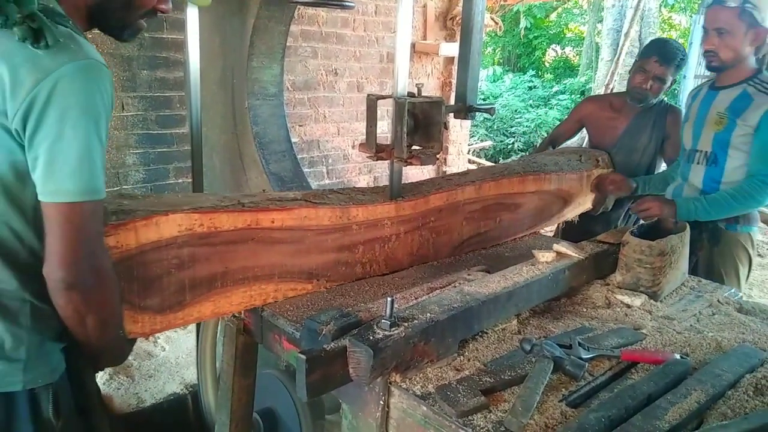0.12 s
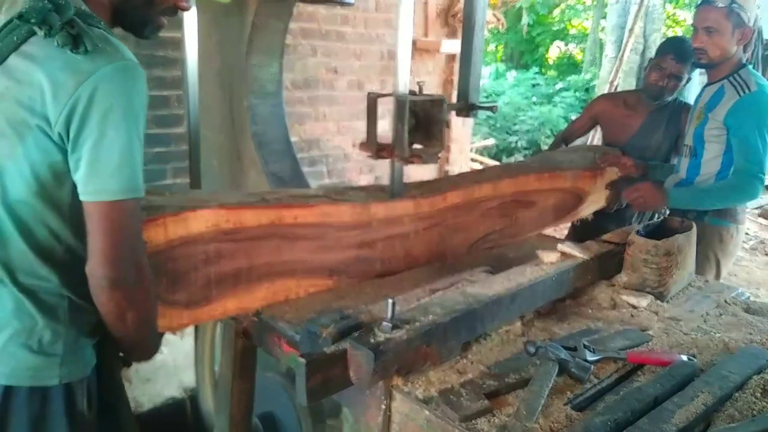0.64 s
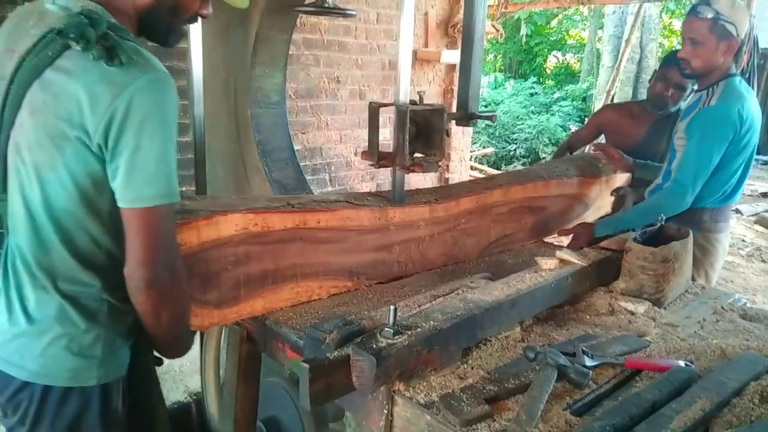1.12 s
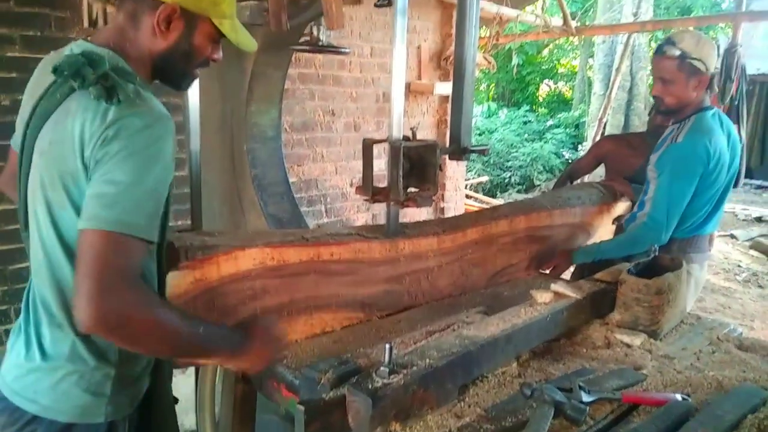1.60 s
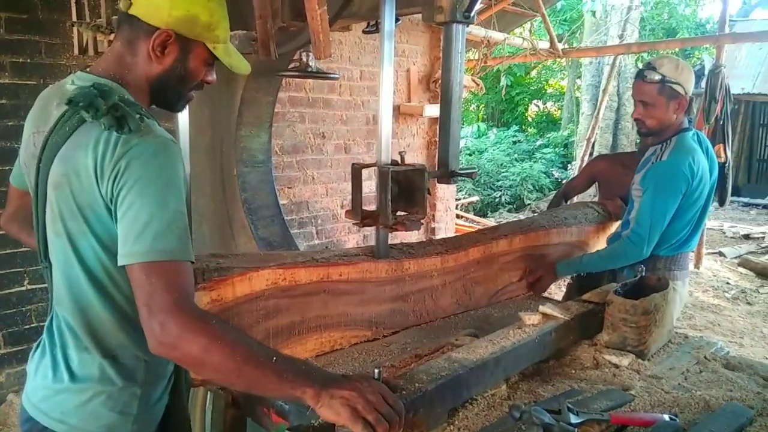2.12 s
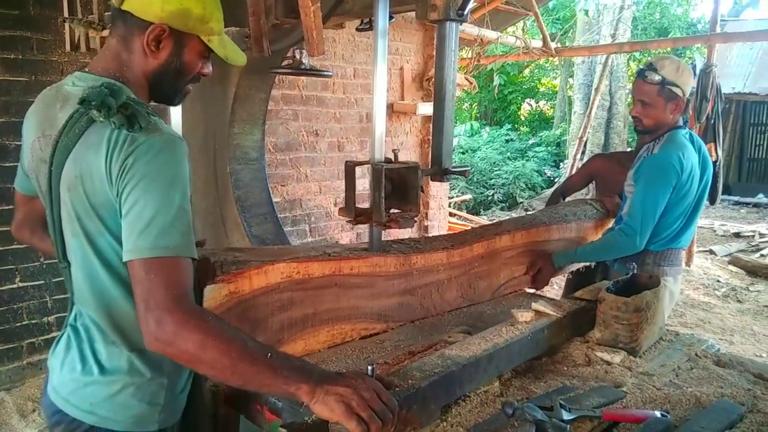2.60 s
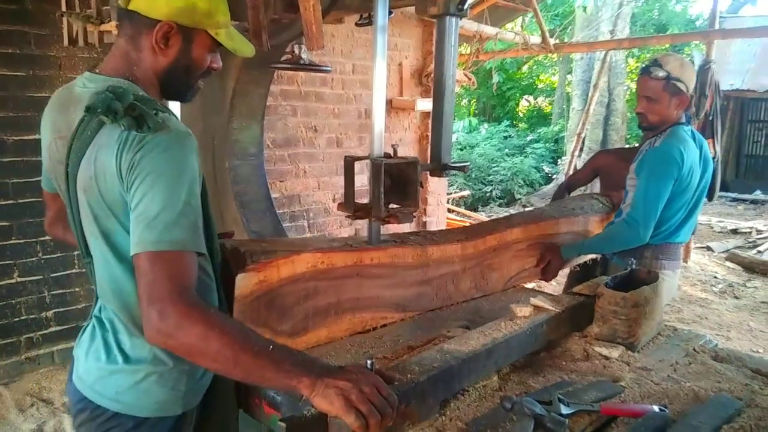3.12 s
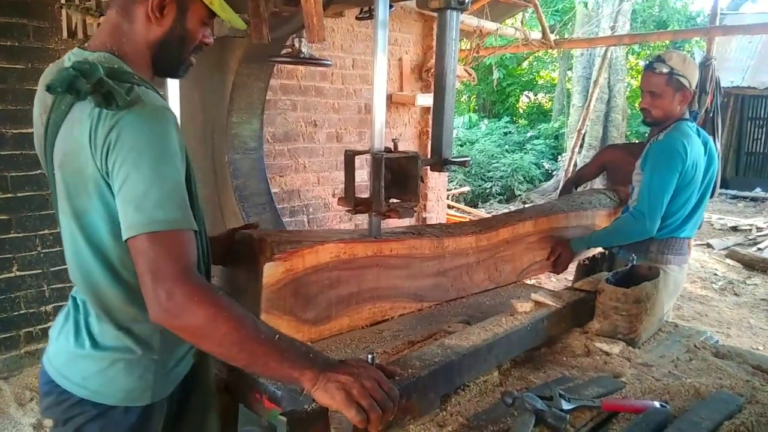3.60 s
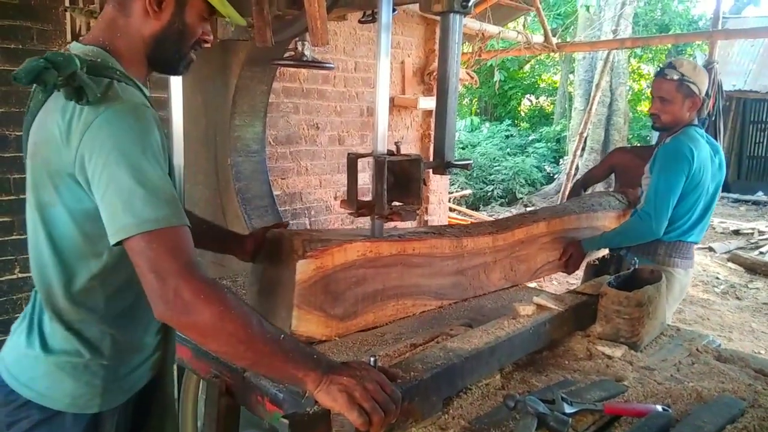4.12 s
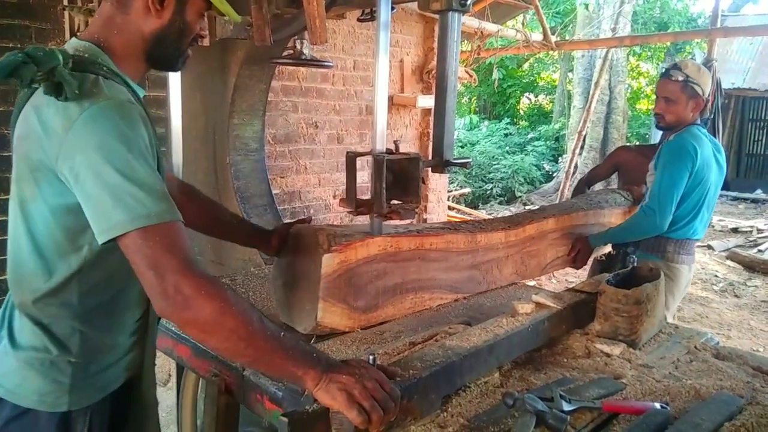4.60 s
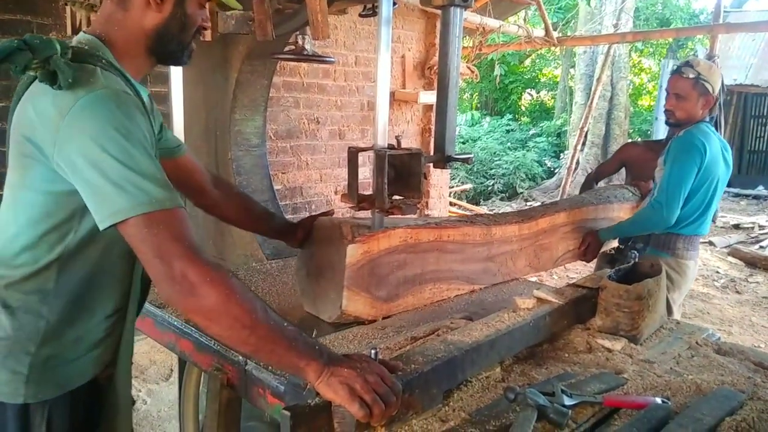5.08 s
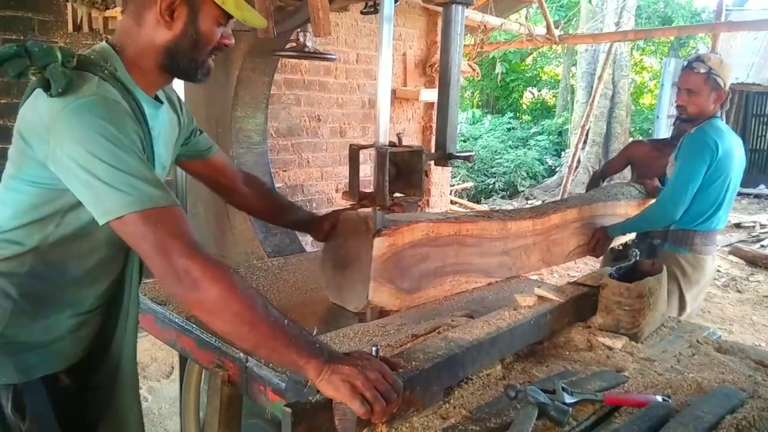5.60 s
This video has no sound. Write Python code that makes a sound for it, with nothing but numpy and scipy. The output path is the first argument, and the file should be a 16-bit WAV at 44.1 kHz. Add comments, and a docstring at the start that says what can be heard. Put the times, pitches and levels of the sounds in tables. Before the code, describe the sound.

In an open shed, a big band saw is already ripping a thick wooden slab and never stops. Loud bright hiss of tearing fibres dominates, over ringing blade steel, a mid-pitched frame hum and low rumble. Short, rough swells come where the teeth bite harder. Very close and slightly overloaded microphone, dry, heard only on the left; the right side is almost silent.

```python
"""In an open shed, a large band saw rips a timber slab close to a single microphone on the left input.
Tearing fibres hiss, as coloured noise, and shake the steel blade, whose cross-width modes ring;
the frame hums as noise shaped by narrow resonances, over a low rumble. The blade's laps and the wheels'
turning throb faintly in the cut as slow sine swings of level. The right input carries only amplifier noise."""
import sys
import numpy as np
from scipy import signal
from scipy.fft import rfft, irfft, next_fast_len
from scipy.io import wavfile
from scipy.ndimage import uniform_filter1d, map_coordinates

SR = 44100
rng = np.random.default_rng(int(sys.argv[2]) if len(sys.argv) > 2 else 0)


def to_wav(s):
    """Save 16-bit WAV."""
    ch = np.atleast_2d(s).T  # columns
    pcm = np.round(np.clip(ch, -1, 1) * 32767)  # PCM
    wavfile.write(sys.argv[1], SR, pcm.astype(np.int16))


def gain_from_db(level_db):
    """Turn a decibel level (scalar or array-like) into a linear amplitude factor."""
    decades = np.asarray(level_db, float) / 20
    return 10 ** decades


N = 252252  # length in samples


def unit(x):
    """Normalisation: a signal divided by its root mean square has unit power."""
    return x / np.sqrt(np.mean(x ** 2) + 1e-20)


def along(spectrum, hz):
    """Spectral envelope: gain interpolated in dB between points on a logarithmic frequency axis."""
    point_hz, point_db = np.transpose(spectrum)
    return gain_from_db(np.interp(np.log(hz + 1), np.log(point_hz + 1), point_db))


def modes(table, hz):
    """Modal superposition: incoherent resonances add in power; width is taken at half amplitude."""
    power = 0
    for centre_hz, width_hz, db in table:
        detuning = 2 * (hz - centre_hz) / width_hz
        power = power + gain_from_db(db) ** 2 / (1 + detuning ** 2) ** 2
    return np.sqrt(power)


def cut_on(hz, cut_on_hz, rise_hz, fade_hz):
    """Waveguide cut-on: steep loss below (5 dB at rise_hz under it), 10 dB lost per fade_hz above."""
    below = ((cut_on_hz - hz) / rise_hz) ** 2 / 2
    above = (hz - cut_on_hz) / fade_hz
    return gain_from_db(-10 * np.where(hz < cut_on_hz, below, above).clip(0, 20))


def wobble(rate):
    """Slow random modulation: a smooth spline through random knots, rate of them a second."""
    knots = rng.standard_normal(int(N * rate / SR) + 4)
    return map_coordinates(knots, [np.arange(N) * rate / SR])


def noise(gain, patchy_db, size=512):
    """Filtered noise of unit rms with random patches in time and pitch; larger size: narrower, longer."""
    cells = signal.stft(rng.standard_normal(N + 2 * size), nperseg=size)[2]
    field = uniform_filter1d(rng.standard_normal(cells.shape), size=5, axis=0)
    field = uniform_filter1d(field, size=10, axis=1)
    patchy = signal.istft(cells * gain_from_db(patchy_db * unit(field)), nperseg=size)[1]
    length = next_fast_len(len(patchy))
    colour = gain(np.fft.rfftfreq(length, 1 / SR))
    return unit(irfft(rfft(patchy, length) * colour, length)[:N])


def loaded(feed_db, level_db, slope):
    """Load dependence: level_db over the mean feed, moving by slope dB per dB of feed."""
    mean_db = feed_db.mean()
    return mean_db + level_db + slope * (feed_db - mean_db)


def throb(table, lap):
    """Harmonic modulation: level swing in dB at multiples of the lap angle."""
    return sum(db * np.sin(multiple * lap + phase) for multiple, db, phase in table)


# How hard the slab is pushed, heard as the hiss. Each row: time in seconds, feed in dB.
FEED_PRESSURE = [(0, -16.6), (.1, -17.5), (.7, -17.5), (1.1, -17), (1.4, -17.5), (1.7, -17.5), (2.2, -17.5),
                 (2.6, -17), (2.9, -16.5), (3.5, -16.5), (3.95, -16.5), (4.3, -17), (4.8, -16.5),
                 (5.0, -17.5), (5.35, -16.5), (5.55, -16.5), (5.67, -15.5), (5.72, -16)]


def feed_pressure():
    """Quasi-static forcing: the push on the slab follows straight lines in dB between its points."""
    seconds, db = np.transpose(FEED_PRESSURE)
    return np.interp(np.arange(N) / SR, seconds, db)


# Spectrum of tearing fibres. Each row: frequency in Hz, relative density in dB per Hz.
FIBRE_SPECTRUM = [(300, -40), (1300, -18), (1800, -13.5), (2380, -16), (2900, -8), (3600, -11),
                  (4500, -12.5), (5900, -12.5), (7000, -4), (8900, 0), (10200, -5), (11500, -7),
                  (12600, -6), (13500, -8), (14400, -8)]
# Throb of the hiss. Each row: multiple of the lap rate, swing in dB, phase in radians.
HISS_SWING = [(2, .38, 1.7), (3, .15, 1.0), (4, .33, -.9), (5, .25, 1.0)]


def fibre_hiss(feed_db, lap, bite_db):
    """Broadband radiation: the tearing of the fibres is heard as coloured noise."""
    level_db = loaded(feed_db, level_db=-1.03, slope=1.33) + throb(HISS_SWING, lap) + bite_db
    return gain_from_db(level_db) * noise(lambda hz: along(FIBRE_SPECTRUM, hz), patchy_db=1.0)


# Throb of the upper blade band. Each row: multiple of the lap rate, swing in dB, phase in radians.
UPPER_SWING = [(1, .7, 2.8), (2, .9, -1.9), (4, .3, -.7)]


def upper_blade_band(feed_db, lap, bite_db):
    """Waveguide propagation: these waves run along the blade only above their cut-on pitch."""
    level_db = loaded(feed_db, level_db=-13.5, slope=2.3) + throb(UPPER_SWING, lap) + 0.6 * bite_db
    colour = lambda hz: cut_on(hz, cut_on_hz=6660, rise_hz=250, fade_hz=840)
    return gain_from_db(level_db) * noise(colour, patchy_db=3.5)


# Level changes where the teeth meet hard grain.
# Each row: centre in seconds, length in seconds (full width at 1/e of the dB gain), gain in dB.
GRAIN_SURGES = [(0.067, .05, 4), (.54, 0.033, 1), (0.643, 0.056, 3), (1.153, .12, 5), (1.7, .07, 3),
                (1.994, 0.036, 4), (2.24, 0.046, 3), (2.587, 0.031, 7), (3.936, .05, 3), (4.28, 0.063, 4.5),
                (5.165, 0.034, 4.5), (5.67, 0.061, -1.5)]


def surges():
    """Transient forcing: bell-shaped changes of level in dB, nearly all of them swells."""
    t = np.arange(N) / SR
    return sum(db * np.exp(-(2 * (t - s) / length) ** 2) for s, length, db in GRAIN_SURGES)


# Throb of the lower blade band. Each row: multiple of the lap rate, swing in dB, phase in radians.
LOWER_SWING = [(1, .6, 2.4), (2, .5, -3.0), (3, .9, -2.8)]


def lower_blade_band(feed_db, lap):
    """Waveguide propagation: a lower cut-on, its level moved by the surges and by a random flutter."""
    level_db = loaded(feed_db, level_db=-16.5, slope=0.4) + throb(LOWER_SWING, lap)
    flutter_db = 0.27 * wobble(39.7)
    colour = lambda hz: cut_on(hz, cut_on_hz=2482, rise_hz=29, fade_hz=230)
    return gain_from_db(level_db + surges() + flutter_db) * noise(colour, patchy_db=0.6, size=2048)


# Narrow blade modes. Each row: frequency in Hz, width in Hz, relative level in dB.
BLADE_MODES = [(1555, 22, -5), (1800, 50, -4), (2085, 28, -1), (2240, 60, -3), (2620, 60, 2), (2863, 30, 3),
               (3118, 50, 3), (3370, 50, -2), (3830, 40, -3), (4030, 60, -3), (4510, 50, -3)]


def blade_ring():
    """Modal resonance: each narrow mode swells and fades on its own as the slab moves along."""
    return gain_from_db(-37.8) * noise(lambda hz: modes(BLADE_MODES, hz), patchy_db=2.1, size=2048)


# Frame and table modes. Each row: frequency in Hz, width in Hz, relative level in dB.
FRAME_MODES = [(138, 55, -13.5), (180, 48, -17), (266, 73, -10), (338, 28, -10), (395, 41, -11),
               (563, 84, -10.5), (648.5, 33, -1), (686, 64, -1.5), (752.5, 32, -1), (816, 21.4, 3.5),
               (857, 32, -2.5), (908, 150, -4), (965, 34, -4), (1004, 33, -7), (1110, 170, -15),
               (1193, 20, -3), (1300, 58, -9)]


def frame_modes(mean_feed_db):
    """Forced resonance: the heavy frame answers the mean pressure through its own modes."""
    level_db = loaded(mean_feed_db, level_db=-22.5, slope=0.71)
    return gain_from_db(level_db) * noise(lambda hz: modes(FRAME_MODES, hz), patchy_db=1.2, size=4096)


# The clearest frame mode. Each row: frequency in Hz, width in Hz, relative level in dB.
HUM_MODE = [(528, 18, 0)]


def frame_hum(mean_feed_db):
    """Damped resonance: pressure on the table damps the hum, so it weakens as the feed grows."""
    level_db = loaded(mean_feed_db, level_db=-37, slope=-6)
    return gain_from_db(level_db) * noise(lambda hz: modes(HUM_MODE, hz), patchy_db=5.0)


# Spectrum of the rumble. Each row: frequency in Hz, relative density in dB per Hz.
RUMBLE_SPECTRUM = [(10, 6.5), (24, 0.5), (40, -2), (90, -2), (250, -5), (450, -3.5), (1000, -16),
                   (3000, -24)]


def low_rumble(mean_feed_db):
    """Filtered noise: a low rumble, its level tied steeply to the smoothed hiss level, wavering slightly."""
    level_db = loaded(mean_feed_db, level_db=-28.5, slope=3.9) + 0.19 * wobble(5.45)
    return gain_from_db(level_db) * noise(lambda hz: along(RUMBLE_SPECTRUM, hz), patchy_db=1.3)


def saw():
    """Superposition: feed drives all layers but the steady blade ring; laps and bite drive some of them."""
    lap_hz, frame_lag_s = 3.45, 0.43
    feed_db = feed_pressure()
    mean_feed_db = uniform_filter1d(feed_db, int(frame_lag_s * SR))
    # the endless blade laps, and its wheels turn twice a lap
    lap = 2 * np.pi * lap_hz * np.arange(N) / SR
    # the grain of the wood makes the bite uneven
    bite_db = 0.11 * wobble(4.9) + 0.21 * wobble(35)
    hiss = fibre_hiss(feed_db, lap, bite_db)
    blade = upper_blade_band(feed_db, lap, bite_db) + lower_blade_band(feed_db, lap) + blade_ring()
    frame = frame_modes(mean_feed_db) + frame_hum(mean_feed_db)
    return hiss + blade + frame + low_rumble(mean_feed_db)


def scene():
    """Single-point pickup: the saw on the left input only, its level sinking over the last moments."""
    fade_s, fade_db = 0.043, -4
    remaining_s = np.arange(N)[::-1] / SR
    fade = gain_from_db(fade_db * np.clip(1 - remaining_s / fade_s, 0, 1))
    return np.array([fade * saw(), np.zeros(N)])


# Spectrum of the amplifier's noise. Each row: frequency in Hz, relative density in dB per Hz.
AMPLIFIER_SPECTRUM = [(10, 0), (40, -3), (300, -16), (1000, -27), (2000, -32), (5000, -39), (9000, -42),
                      (11800, -41), (12300, -38), (13400, -41), (13700, -46)]


def amplifier_noise():
    """Electronic self-noise: an input without a microphone still carries a faint coloured noise."""
    return gain_from_db(-61.5) * noise(lambda hz: along(AMPLIFIER_SPECTRUM, hz), patchy_db=4.0)


def top_cut(x):
    """Nothing passes above the cut-off."""
    return signal.sosfilt(signal.butter(12, 14260, fs=SR, output="sos"), x)


def record(dry):
    """Amplification and saturation: input gain, noise on the right input, full-scale clipping."""
    mix = gain_from_db(8.0) * dry
    mix[1] += amplifier_noise()
    return top_cut(np.clip(mix, -1, 1))


dry = scene()
out = record(dry)
to_wav(out)
```